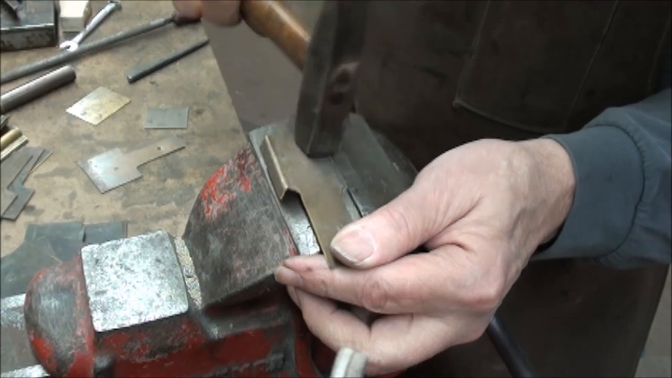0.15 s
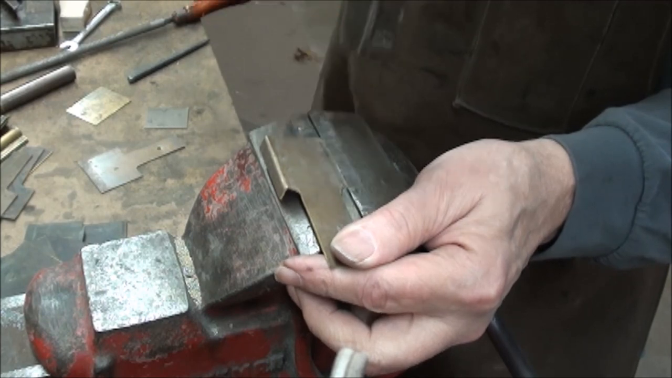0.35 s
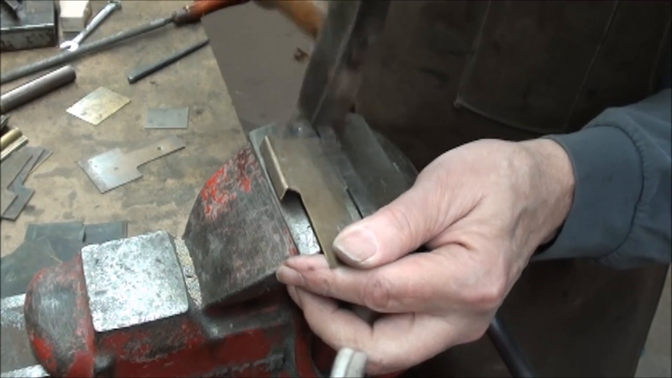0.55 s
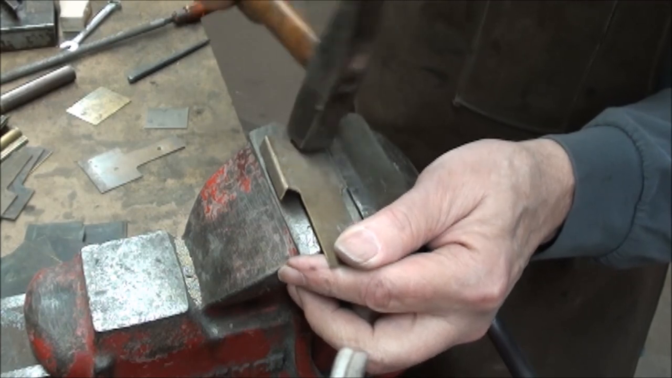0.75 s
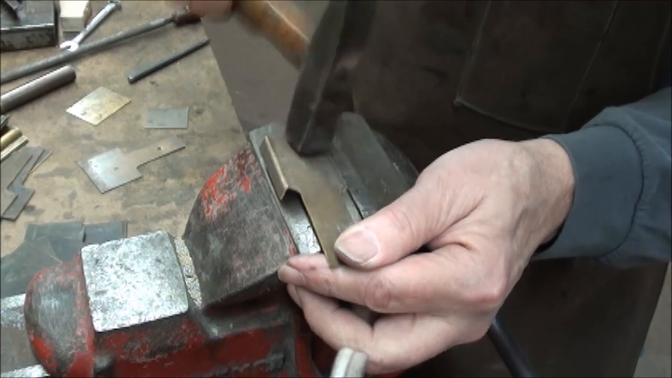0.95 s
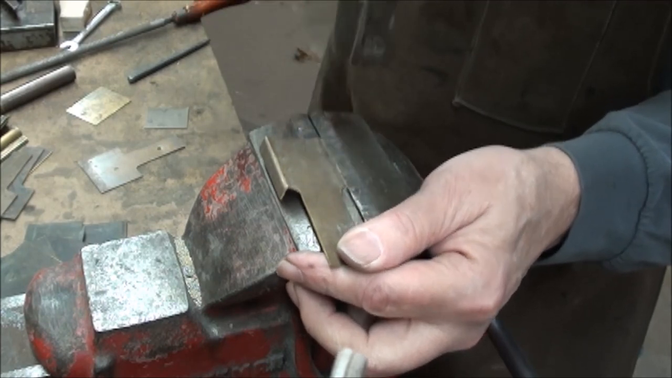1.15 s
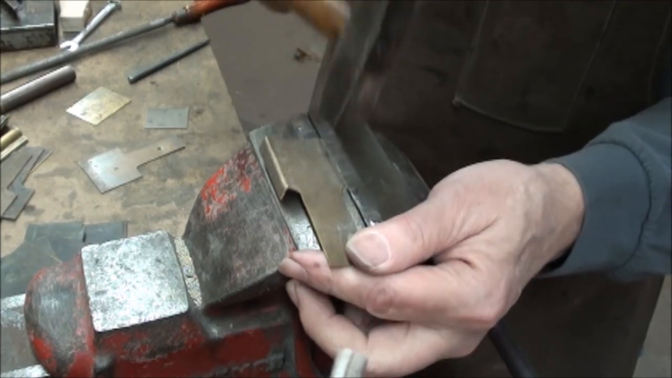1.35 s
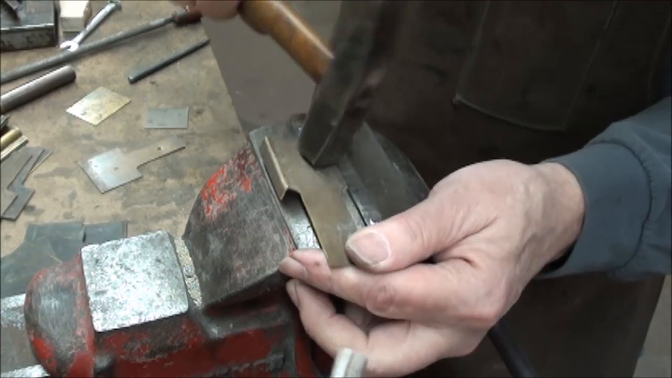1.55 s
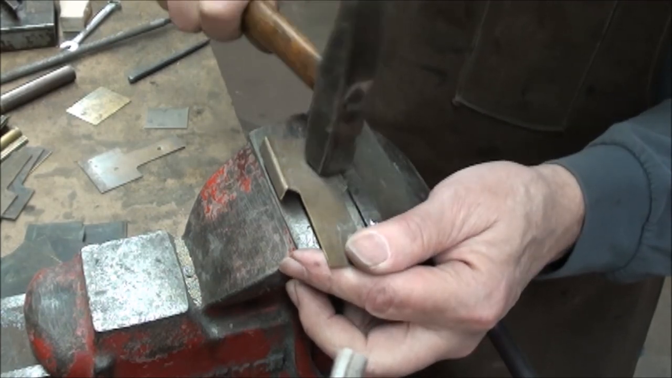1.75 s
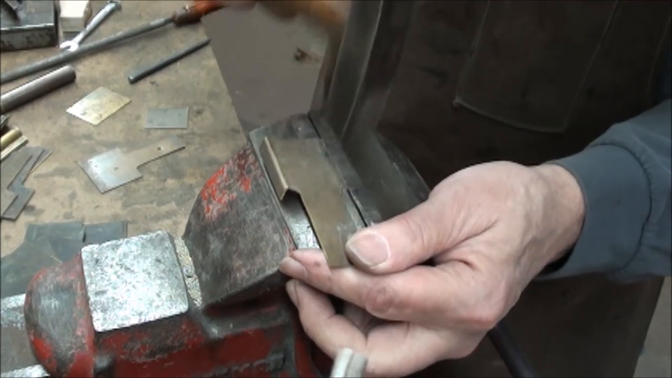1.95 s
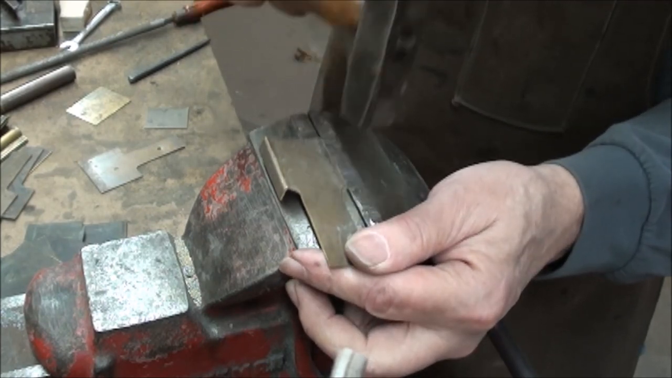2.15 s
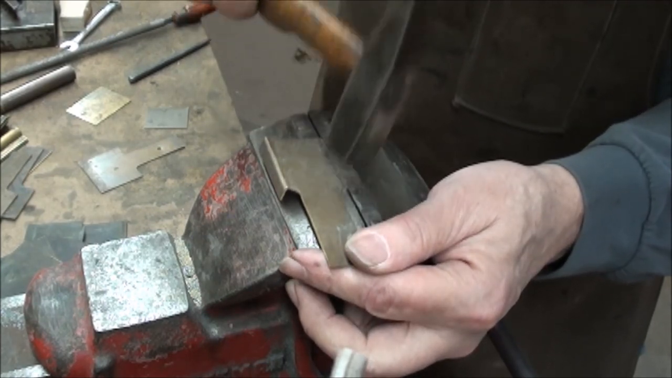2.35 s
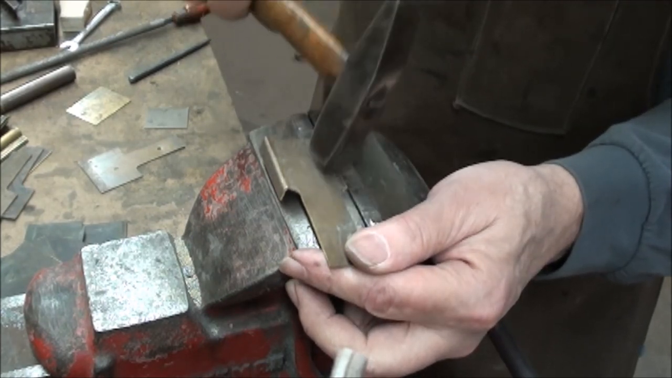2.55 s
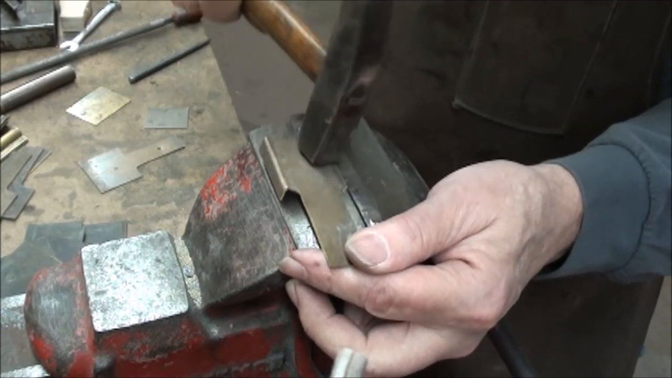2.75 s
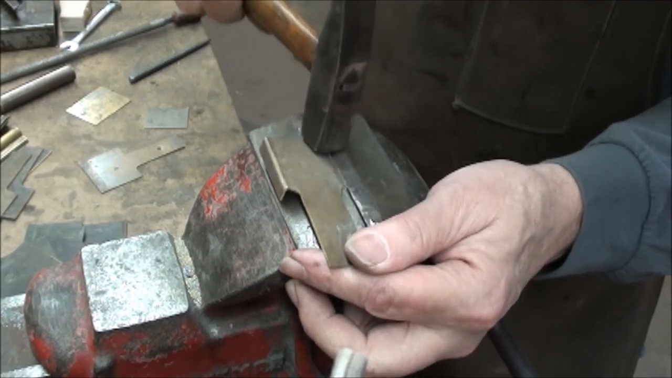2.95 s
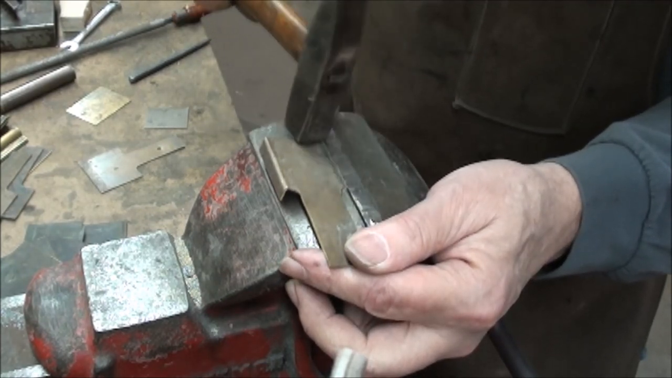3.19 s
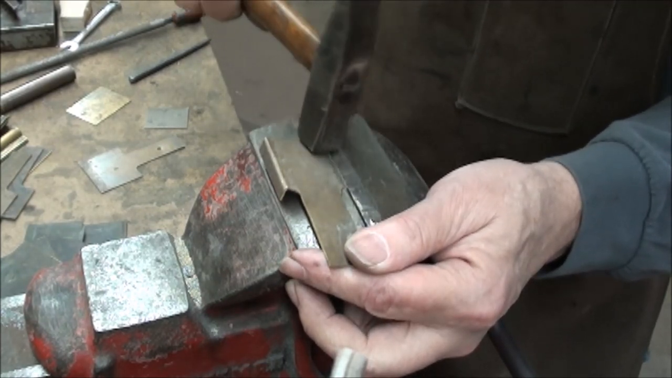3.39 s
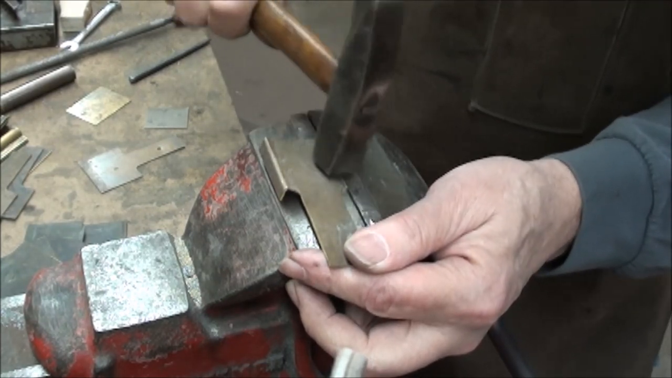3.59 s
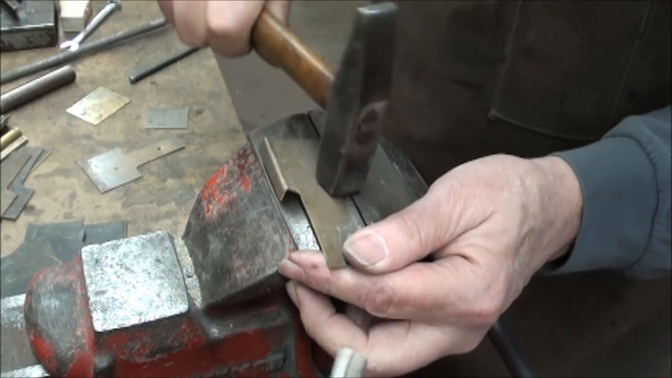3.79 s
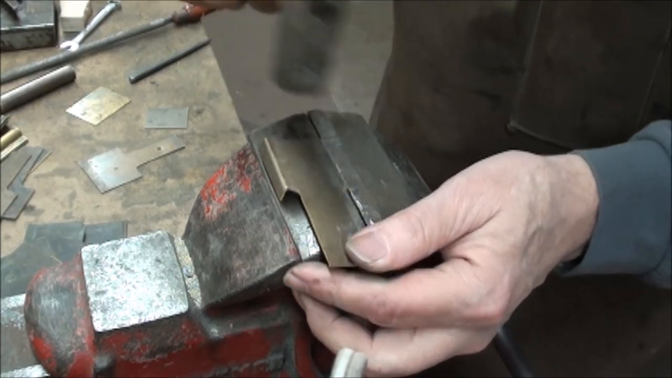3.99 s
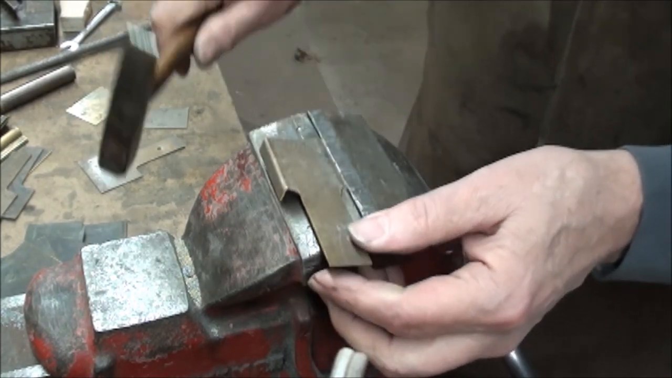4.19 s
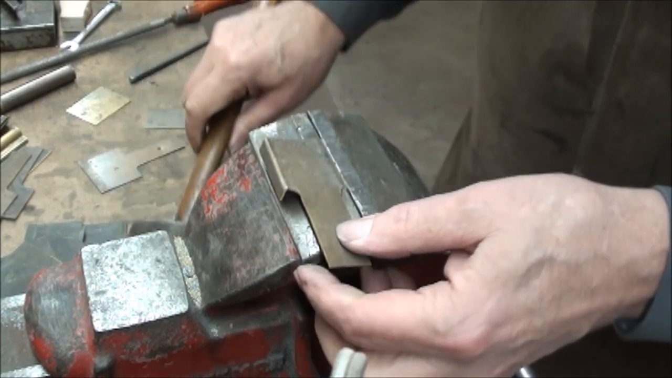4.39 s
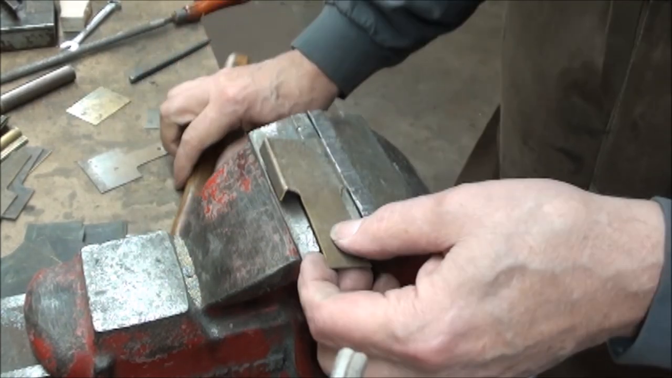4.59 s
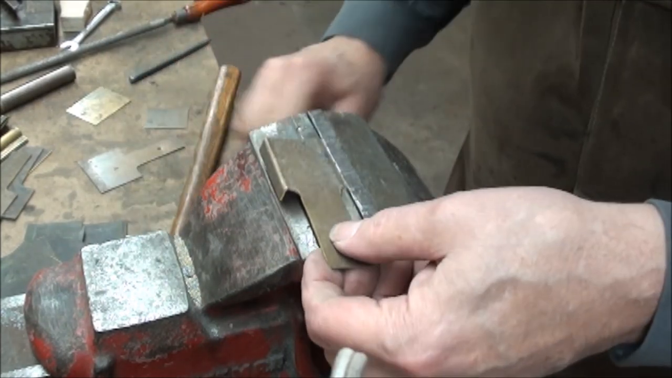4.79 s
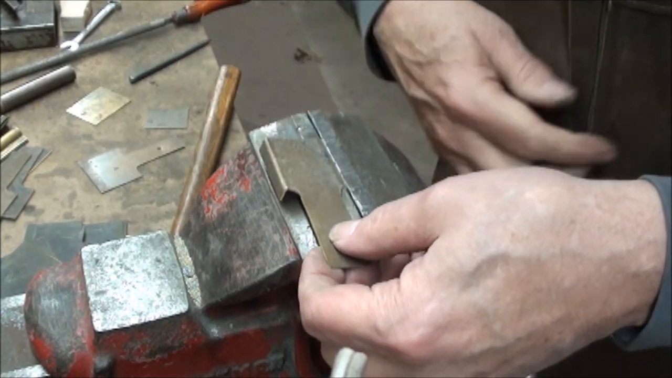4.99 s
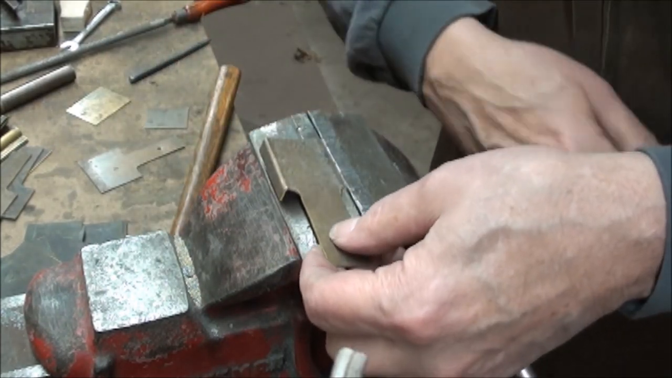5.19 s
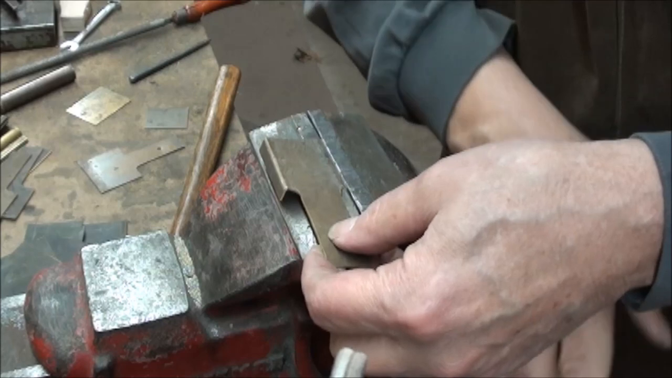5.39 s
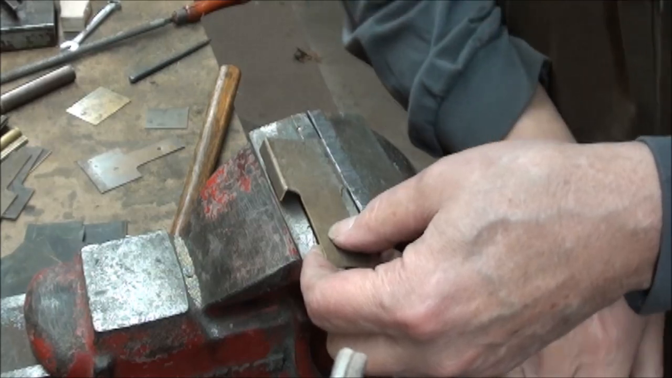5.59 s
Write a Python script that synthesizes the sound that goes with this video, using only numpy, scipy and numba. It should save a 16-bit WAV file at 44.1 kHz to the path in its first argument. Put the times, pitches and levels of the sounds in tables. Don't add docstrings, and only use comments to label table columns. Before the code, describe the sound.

A hammer taps a metal strip on a bench vise about four times a second, then is laid down with a knock and jingling tools.

```python
import sys
import numpy as np
from scipy import signal
from scipy.fft import rfft, irfft, next_fast_len
from scipy.io import wavfile
from numba import njit

SR = 44100
rng = np.random.default_rng(int(sys.argv[2]) if len(sys.argv) > 2 else 0)


def rack_gain(trim_db):
    fader = np.asarray(trim_db, float)
    return 10 ** (fader / 20)


def to_wav(s):
    ch = np.atleast_2d(s).T
    pcm = np.round(np.clip(ch, -1, 1) * 32767)
    wavfile.write(sys.argv[1], SR, pcm.astype(np.int16))


N = 248724

# (time [s], clang level [dB], glancing brightness [dB], spot along the jaw [cm], spot across it [cm])
BLOWS = [(-0.035, -25, 10.0, -1.16, -0.6), (0.2438, -27.0, 8.0, 0.63, 1.1),
         (0.5162, -25.5, -10, 0.61, -0.5), (0.7904, -27.5, 0.5, 0.99, 0.7),
         (1.0592, -34, 13.5, 0.24, -0.13), (1.319, -28.0, -31, -0.18, -1.05),
         (1.5863, -27.5, -17, 0.22, -0.94), (1.839, -28.5, 2.5, -0.75, -1.1),
         (2.0856, -29.5, 7, -0.87, -0.84), (2.3349, -25.5, -20, -1.97, 3), (2.5655, -27.5, -30.0, -1.2, 0),
         (2.788, -29.5, -7.0, -0.93, -0.9), (3.005, -30, -13, 1.16, -0.54), (3.2249, -31, -2.0, 2.36, 0.7),
         (3.4328, -30.0, -18, 0.43, 0), (3.6415, -28.5, -30.5, 0.39, -0.09), (3.8472, -31, 0, 0.55, 0.05)]
# (frequency [Hz], twin's distance below [Hz], decay time t60 [s])
VISE_MODES = [(2374, 34, .38), (3830, -55, .31), (5420, 33, .33), (7175, -45, .3), (9005, -15, .27),
              (1962, -48, .28)]
SCREW_MODES = [(940, 6, .55), (1347, 2, 1.2), (2871, 8, .4), (3060, 10, .36), (5700, -55, .4),
               (6700, 20, .38)]
HEAD_MODES = [(9770, 35, .2), (11140, 30, .2), (12270, 40, .16), (8330, -30, .2), (7620, -50, .2),
              (4120, -70, .25)]
BENCH_MODES = [(68, 3, .7), (385, -22, .33)]
# (level at mid jaw [dB], slope along [dB/cm], slope across [dB/cm],
# slope with brightness [dB/dB], drift as the strip beds down [dB/s])
VISE_SHAPE = [(-25, 2.2, -9.5, -.1, -0.5), (-26.5, -2, -1.3, -0.057, 2.5), (-24, -2, -2, -0.0372, -.2),
              (-32.5, -0.8, -0.5, 0.0053, -1.1), (-37.5, -1.5, 1.4, -0.1, -2), (-34, -7, -1.5, 0.08, -1.9)]
SCREW_SHAPE = [(-34.24, -3.5, -1, -0.14, -3), (-33, -1.44, 3, -0.19, -2), (-33.5, 0.5, 0, -0.32, 2),
               (-36, -4, 2.5, -0.17, -1.2), (-35, -3, 2.8, 0.011, -2.5), (-32, -2.5, -0.5, -0.12, -1)]
HEAD_SHAPE = [(-45, -1, -2, -0.08, 0), (-50.5, -0.8, -3, 0.03, 0), (-60, -0.68, -3.17, -0.05, -0.93),
              (-46.5, -1, 0, 0.06, -3), (-47.5, -0.05, 2, 0.08, -3.5), (-39, -4.5, 0.9, 0.1, 0.5)]
BENCH_SHAPE = [(-31.5, 1.7, -1.5, 0.06, -2.91), (-30.99, 0.98, 0.76, -0.02, -2)]
# the five columns of the shapes, then (slope with clang level [dB/dB])
THUD = (-2, 0.84, -0.55, 0.0259, -2, -.73)
# (frequency [Hz], density [dB per Hz])
CLANG = [(24, -44), (45, -16), (68, -5), (120, -7), (165, 1.5), (300, 2), (385, 8.5), (600, 4), (1060, 1),
         (3900, -2.5), (4800, -18), (5500, -8.5), (11300, -28.5), (15500, -96)]
# (time [s], peak level [dB])
CHATTER = [(0.003, -4), (0.259, -11), (0.2687, -16), (0.28, -10), (0.5438, -8), (0.555, -6), (0.8059, -3),
           (0.831, 0), (0.847, -14), (1.0768, -3), (1.0856, -1.5), (1.338, -12), (2.5909, -8),
           (3.2463, -2.5), (3.2694, -10), (3.4719, -17), (3.6715, -12), (3.87, -3.5), (3.881, -17)]
# (time [s], peak level [dB])
TICKS = [(0.2431, -24.5), (0.2882, -26), (0.5167, -6), (0.5616, -30), (0.7896, -12), (1.06, -6),
         (1.077, -27.5), (1.3177, -33.5), (1.5854, -31), (1.6053, -25), (1.8378, -23), (1.8547, -19),
         (2.0854, -22.5), (2.3346, -25), (2.5671, -23), (2.5885, -23), (2.6045, -25), (2.7874, -17),
         (2.8075, -25), (3.0058, -19), (3.2263, -25), (3.4341, -22), (3.455, -21), (3.6408, -10.5),
         (3.6691, -24), (3.845, -24), (3.872, -25)]
# (frequency [Hz], level [dB])
SING = [(7215, 0), (9770, -8), (8670, -10), (12250, -14), (5400, -8), (6490, -10), (3838, -9)]
# (time [s], wood knock level [dB], steel jingle level [dB], jingle rise [s], knock's top [Hz])
LAID = [(4.298, -74, -52, .004, 2000), (4.5002, -23, -27, 0.0038, 930), (4.511, -27.5, -30.5, 0.0022, 1200),
        (4.5553, -12.5, -20, 0.0055, 2500), (4.611, -22.5, -8.5, 0.0013, 3020),
        (4.617, -33, -16, .001, 2780), (4.643, -25, -17.5, .006, 3000), (4.65, -44, -14, 0.0043, 3000),
        (4.659, -47, -12, 0.0031, 3000), (4.676, -40, -23, 0.0036, 3000), (4.688, -44, -17, 0.003, 3000),
        (4.7247, -14.5, -24, .002, 4000)]
# (frequency [Hz], width [Hz], level [dB])
WOOD = [(70, 40, -20), (191, 86, -14.5), (339, 98, 0), (650, 185, 4.5), (1210, 300, -1), (1635, 280, 2),
        (2180, 380, 1), (3130, 1660, -7)]
TOOLS = [(4200, 380, 0), (5340, 360, -1), (6420, 760, 2), (7400, 800, 3.5), (8240, 330, 6),
         (9320, 480, 3.5), (12100, 2800, -12)]
# (frequency [Hz], density [dB per Hz])
CLOTH = [(290, -42), (500, -17), (1020, -2.5), (1650, -5), (1800, -4), (2610, -4.5), (6390, -3.5),
         (15000, -21)]
HUM = [(20, -46.5), (60, -20), (120, -14), (175, -9.5), (300, -7), (420, -10.5), (700, -14.5), (1500, -18),
       (3000, -61)]
HISS = [(500, -9), (1000, -3), (2000, 1.5), (4000, -4), (6000, -1), (8000, 1), (10000, -10), (13000, -21.5),
        (16500, -43)]
# (frequency [Hz], decay time t60 [s])
SHOP = [(80, 0.36), (300, 0.35), (1500, 0.38), (5000, 0.32), (11000, 0.25), (15000, 0.19)]
# (frequency [Hz], rise time [s])
BUILD = [(100, 0.01), (500, 0.019), (2000, 0.0058), (8000, 0.0046)]
# (frequency [Hz], side against mid [dB])
WIDE = [(60, -42), (180, -31), (350, -26), (700, -17), (1400, -14), (2800, -14), (5600, -11), (10000, -16),
        (14000, -19)]
# (frequency [Hz], half the level difference [dB])
LEFT_DB = [(250, 0), (1400, .25), (5600, .5), (12000, .35)]

AGE = 0.14
LEAD, LONG, TAIL = SR // 10, SR, SR * 3 // 5
USUAL_BRIGHT_DB, USUAL_DB, MID_RUN_S = -8, -29, 2
ROOM_TOP_HZ = 13800
# (time of the peak [s], peak level [dB], rise [dB/s], fall [dB/s])
SINGING, GRIP = (3, -66, 1, 58.5), (4.5, -56, 250, 420)
SKID, SWISH = (4.69, -33.5, 250, 190), (5, -48.5, 172, 330)
HUM_DB, HISS_DB = -63, -61
DUCKED_HUM_DB, DUCKED_HISS_DB = -7, -6.5
RECOVER_S, RECOVER_SPAN_S = 4.95, 0.09


def hammer(track):
    modes = VISE_MODES + SCREW_MODES + HEAD_MODES + BENCH_MODES
    shapes = np.array([*VISE_SHAPE, *SCREW_SHAPE, *HEAD_SHAPE, *BENCH_SHAPE])
    crack_body = resonances([(2500, 7600, -4.5), (7860, 3800, 8.5), (11900, 5900, -5)])
    for s, db, bright_db, along_cm, across_cm in BLOWS:
        contact = [1, along_cm, across_cm, bright_db - USUAL_BRIGHT_DB, s - MID_RUN_S]
        levels = shapes @ contact
        dull_db = np.dot(THUD, [*contact, db - USUAL_DB])
        add(track, s, echo(clang_colour(db, dull_db, bright_db, modes, levels)))
        for mode, level in zip(modes, levels):
            add(track, s, ring(*mode, level - 23.0, twin=0.79, smear=1.04))
        add(track, s, ring(106, 4, .4, levels[-2] - 24))
        add(track, s, rack_gain(db + 19.5) * burst(0.066, 0.000073, crack_body))


def clang_colour(db, dull_db, bright_db, modes, levels):
    tilt = [(500, dull_db), (1500, 0.0036), (5500, 0.019), (9000, bright_db + 4)]

    def colour_db(hz):
        power = rack_gain(2 * (db - 1.5 + along(CLANG, hz) + along(tilt, hz)))
        for (centre, *_), level in zip(modes, levels):
            half_width = 0.014 * centre + 16
            power = power + rack_gain(2 * (level - 2.5)) / (1 + ((hz - centre) / half_width) ** 2)
        return 10 * np.log10(power)

    return colour_db


def chatter(track):
    strip = resonances([(7570, 990, 8), (12000, 4400, -12)])
    for s, db in CHATTER:
        add(track, s - .0005, rack_gain(min(db, -3) + 2.5) * burst(0.011, 0.00017, strip))
    steel = resonances([(12100, 500, 18.5), (14600, 7500, -3.0)])
    for s, db in TICKS:
        add(track, s, rack_gain(db - 7.0) * burst(0.0057, .0002, steel))


def lifted():
    t = np.arange(N) / SR
    tones = 0
    for hz, db in SING:
        tones = tones + rack_gain(db) * np.imag(np.exp(2j * np.pi * hz * t) * drift(N, 32))
    free = t > BLOWS[-1][0]
    level = rack_gain(swell(*SINGING)) + rack_gain(swell(*GRIP))
    return free * level * tones * [[1], [.2]]


def laid_down(track):
    tools = resonances(TOOLS)
    wood_modes = resonances(WOOD)
    push = np.zeros((2, SR // 4))
    push[:, 0] = 1, .1
    for s, knock_db, jingle_db, rise, top_hz in LAID:
        def wood(hz):
            return wood_modes(hz) / (1 + 1j * hz / top_hz) ** 2

        def wood_room_db(hz):
            return knock_db - 17 + 20 * np.log10(np.abs(wood(hz)) + 0.0069)

        def tools_room_db(hz):
            return jingle_db - 40.5 + 20 * np.log10(np.abs(tools(hz)) + .05)

        thump = filtered(push, wood)
        add(track, s, rack_gain(knock_db + 8) * thump / np.abs(thump).max())
        add(track, s, rack_gain(knock_db + 5.5) * burst(0.06, 0.00074, wood))
        add(track, s, rack_gain(jingle_db + 6.5) * burst(0.036, rise, tools))
        add(track, s, echo(wood_room_db))
        add(track, s, echo(tools_room_db))


def sleeve():
    return rack_gain(swell(*SWISH) + lumps(60, 2.2)) * coloured(CLOTH)


def air():
    t = np.arange(N) / SR
    ducked = 1 / (1 + np.exp((t - RECOVER_S) / RECOVER_SPAN_S))
    hum = rack_gain(HUM_DB + DUCKED_HUM_DB * ducked + lumps(14, 0.67)) * coloured(HUM)
    hiss_level = rack_gain(HISS_DB + DUCKED_HISS_DB * ducked) + rack_gain(swell(*SKID))
    hiss = hiss_level * rack_gain(lumps(24.23, 0.65)) * coloured(HISS)
    circuit = rack_gain(-72) * coloured([(3000, -21), (9000, -3.0), (16500, -4.0)])
    return hum + hiss + circuit


def echo(colour_db):
    hz, t, z = signal.stft(wide_noise(TAIL), SR, nperseg=256)
    build = 1 - np.exp(-t / along(BUILD, hz)[:, None])
    fall = rack_gain(-60 * (t - AGE) / along(SHOP, hz)[:, None])
    tail = signal.istft(z * build * fall, SR, nperseg=256)[1]
    return filtered(tail[:, :TAIL], lambda f: rack_gain(colour_db(f)) / (1 + (f / ROOM_TOP_HZ) ** 8))


def ring(hz, twin_hz, t60, db, twin=0.62, smear=0.67):
    seconds = min(AGE + t60 * 3 / 4, 3 / 4)
    t = np.arange(int(seconds * SR)) / SR
    phase = rng.uniform(0, 2 * np.pi, 2)
    tone = np.exp(2j * np.pi * hz * t + 1j * phase[0])
    pair = tone * (1 + twin * np.exp(-2j * np.pi * twin_hz * t + 1j * phase[1]))
    rate = min(1.283 * np.sqrt(hz), 300)
    mid = pair * (1 + smear * drift(len(t), rate))
    side = pair * rack_gain(along(WIDE, hz) + 3.5) * drift(len(t), rate)
    decay = rack_gain(db - 60 * (t - AGE) / t60)
    onset = 1 - np.exp(-t * hz / 4)
    return np.imag([mid, side]) * decay * onset


def burst(t60, rise, response):
    t = np.arange(SR // 12) / SR
    force = wide_noise(len(t)) * rack_gain(-60 * t / t60) * (1 - np.exp(-t / rise))
    x = filtered(force, response)
    return x / np.abs(x[0]).max()


def resonances(modes):
    def response(f):
        total = 0
        for k, (centre, width, db) in enumerate(modes):
            damping = 1j * f * width
            total = total + (-1) ** k * rack_gain(db) * damping / (centre * centre - f * f + damping)
        return total

    return response


def swell(s, db, rise_db, fall_db):
    t = np.arange(N) / SR - s
    return db - np.where(t < 0, -t * rise_db, t * fall_db)


def drift(n, rate):
    count = int(n * rate / SR) + 2
    re, im = rng.standard_normal((2, 1200))[:, :count]
    return np.interp(np.arange(n) * rate / SR, np.arange(count), re + 1j * im) * np.sqrt(.75)


def lumps(rate, db):
    t = np.arange(N) / SR
    return db * np.interp(t * rate, np.arange(400), rng.standard_normal(400))


def coloured(colour):
    noise = filtered(wide_noise(N), lambda hz: rack_gain(along(colour, hz)))
    return unit(noise) * np.sqrt(2)


def wide_noise(n):
    return filtered(rng.standard_normal((2, n)), lambda hz: [hz ** 0, rack_gain(along(WIDE, hz))])


def unit(x):
    return x / np.sqrt(np.mean(x ** 2) + 1e-20)


def along(points, hz):
    f, v = np.transpose(points)
    return np.interp(np.log(hz + 1), np.log(f + 1), v)


def filtered(x, response):
    m = next_fast_len(x.shape[-1] + 2048)
    spectrum = rfft(x, m) * response(np.fft.rfftfreq(m, 1 / SR))
    return irfft(spectrum, m)[..., :x.shape[-1]]


def add(track, s, sound):
    part = track[:, LEAD + round(s * SR):][:, :sound.shape[1]]
    part += sound


def scene():
    track = np.zeros((2, LEAD + N + LONG))
    hammer(track)
    chatter(track)
    laid_down(track)
    mid, side = track[:, LEAD:LEAD + N] + lifted() + sleeve() + air()
    left_right = np.array([mid + side, mid - side])
    return filtered(left_right, lambda hz: rack_gain(np.outer([1, -1], along(LEFT_DB, hz))))


@njit
def follow(level, attack, release):
    out, held = np.empty_like(level), level[0]
    for i in range(len(level)):
        held += (level[i] - held) * (attack if level[i] > held else release)
        out[i] = held
    return out


def low_pass(x):
    return signal.sosfilt(signal.butter(12, 16820, fs=SR, output="sos"), x)


def record(dry):
    heard = filtered(dry, lambda hz: (1j * hz / 50 / (1 + 1j * hz / 50)) ** 2)
    attack_s, release_s = 0.000082, 0.0087
    level = follow(np.abs(heard).max(0), 1 / (attack_s * SR), 1 / (release_s * SR))
    limited = heard / (1 + (level / rack_gain(-10.5)) ** 4) ** 0.28
    clipped = limited / (1 + np.abs(limited / .6) ** 6) ** (1 / 6)
    kept = filtered(clipped, lambda hz: 1 / (1 + (hz / 15800) ** 60))
    return low_pass(kept)


dry = scene()
out = record(dry)
to_wav(out)
```